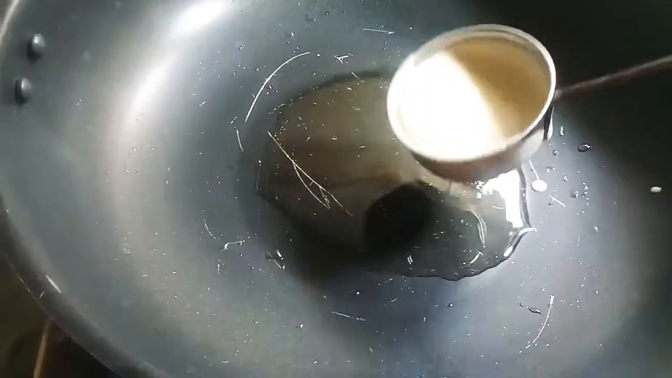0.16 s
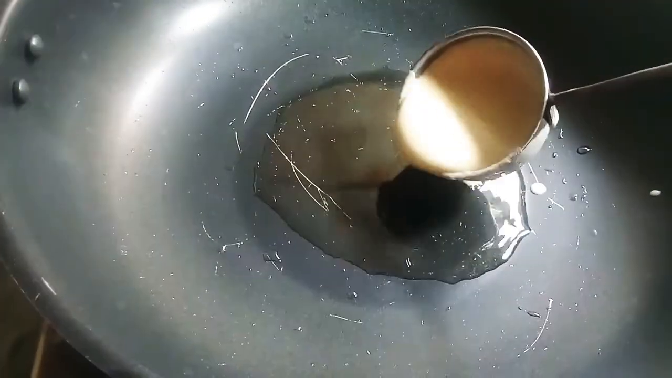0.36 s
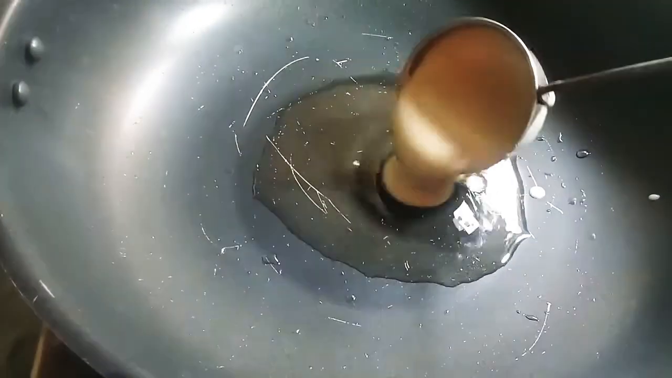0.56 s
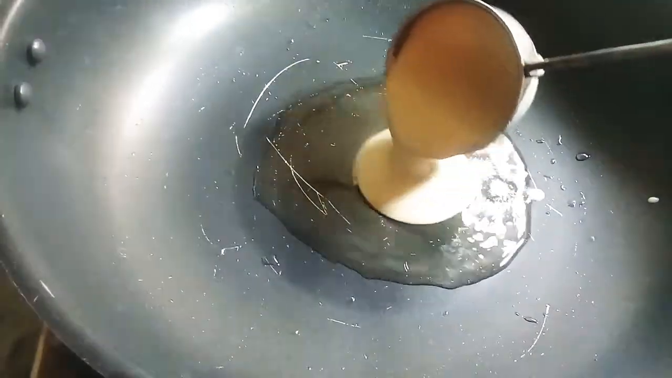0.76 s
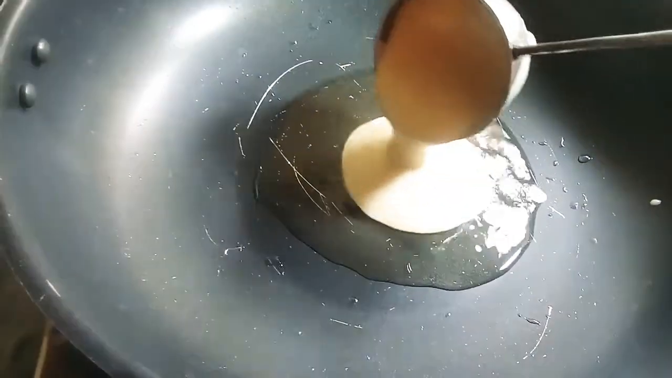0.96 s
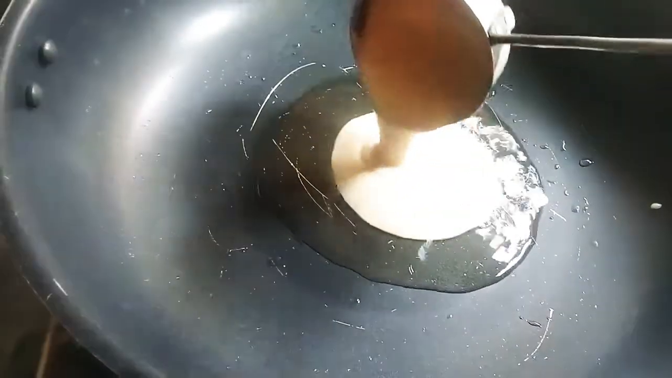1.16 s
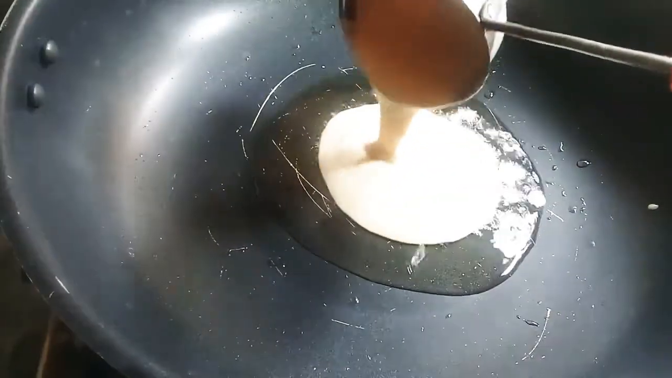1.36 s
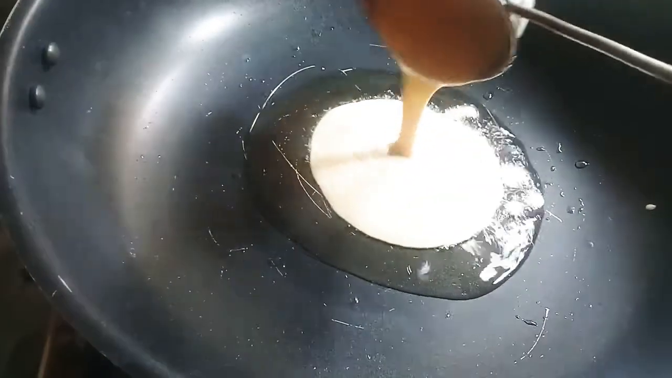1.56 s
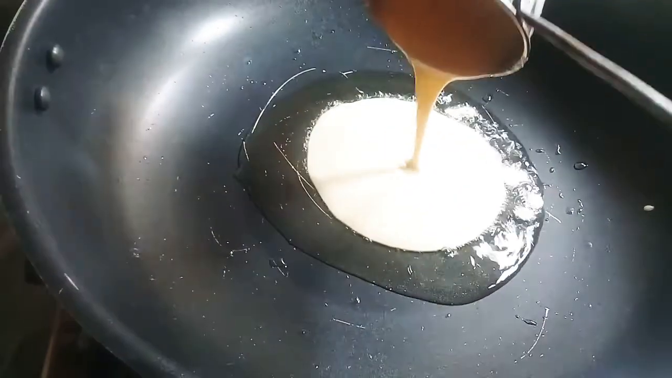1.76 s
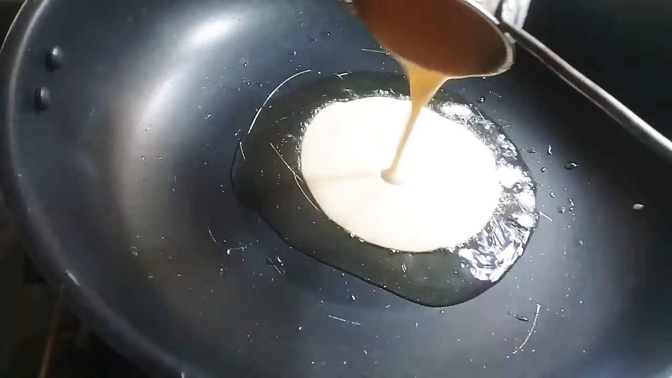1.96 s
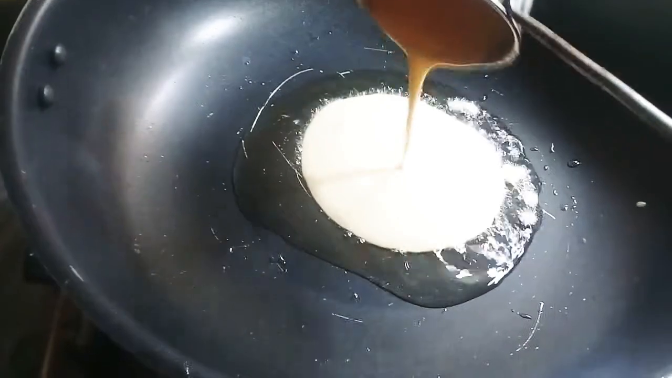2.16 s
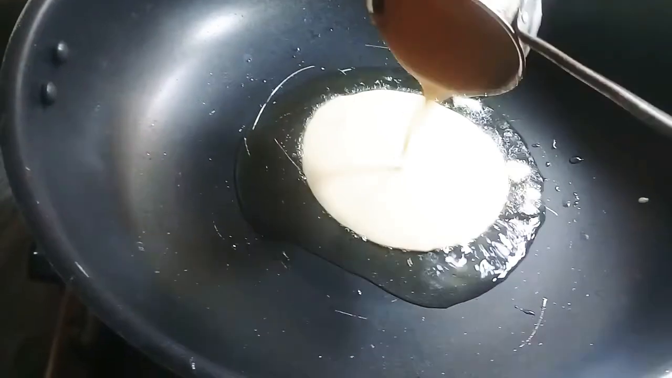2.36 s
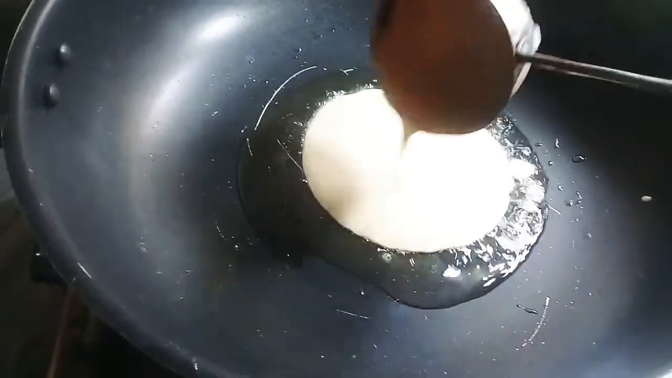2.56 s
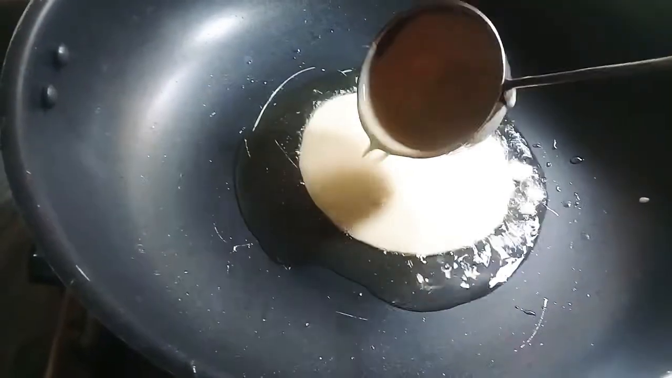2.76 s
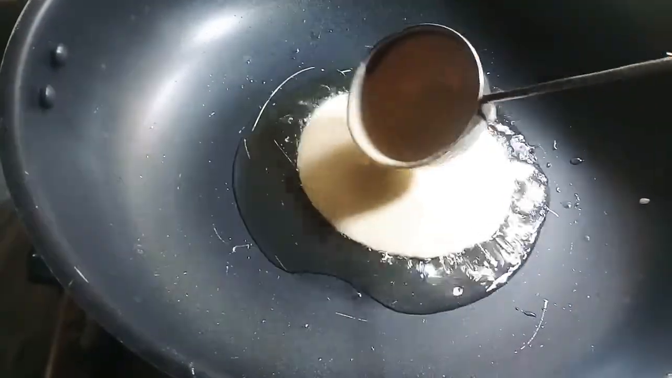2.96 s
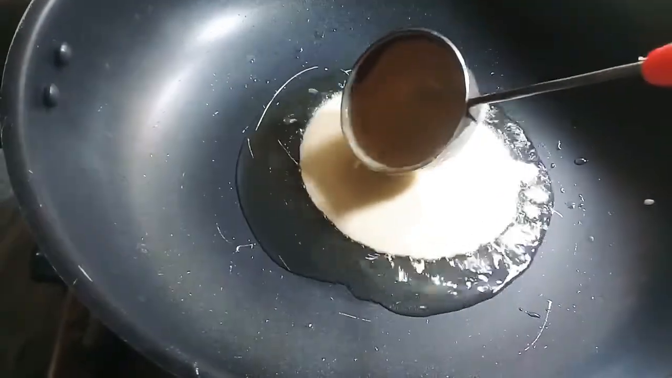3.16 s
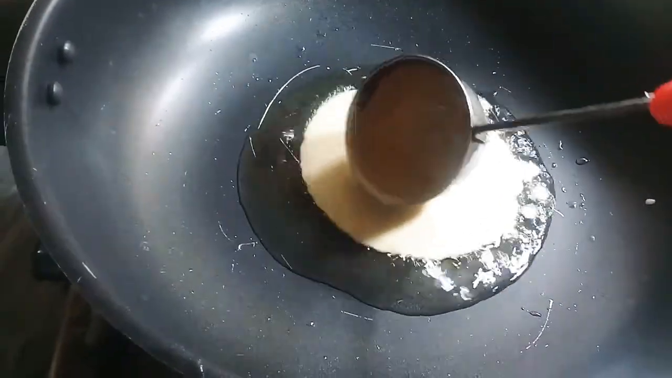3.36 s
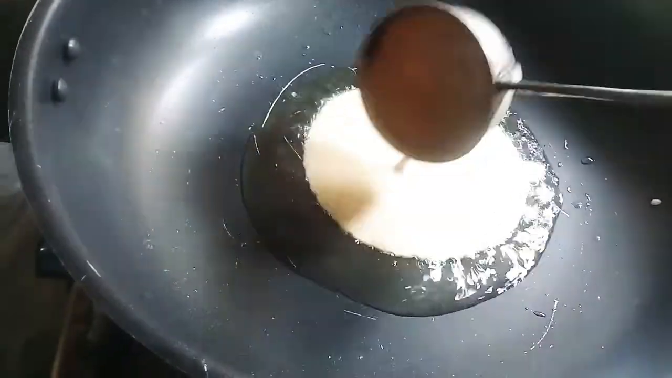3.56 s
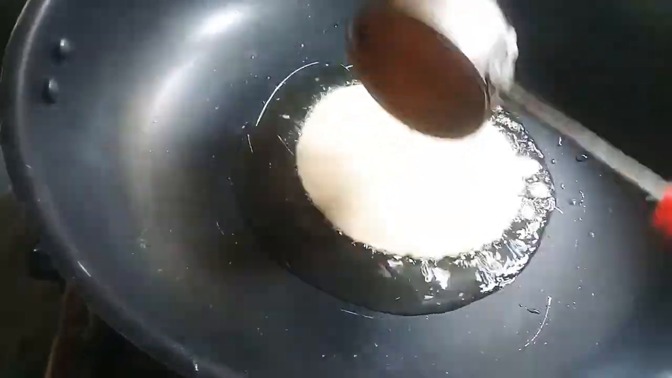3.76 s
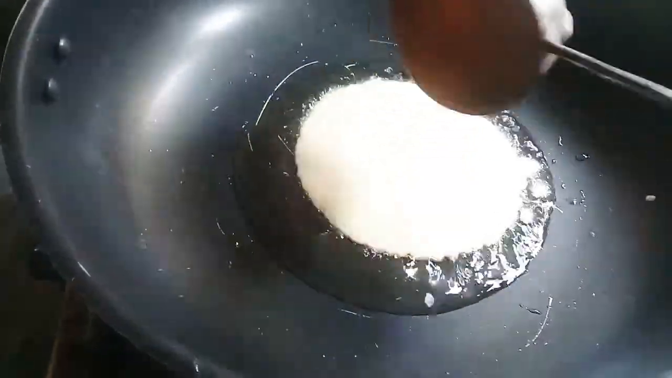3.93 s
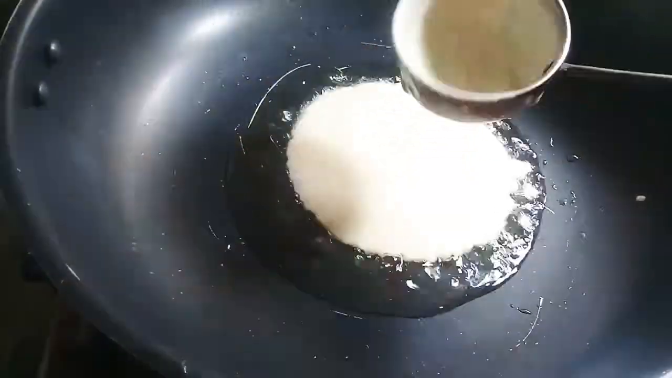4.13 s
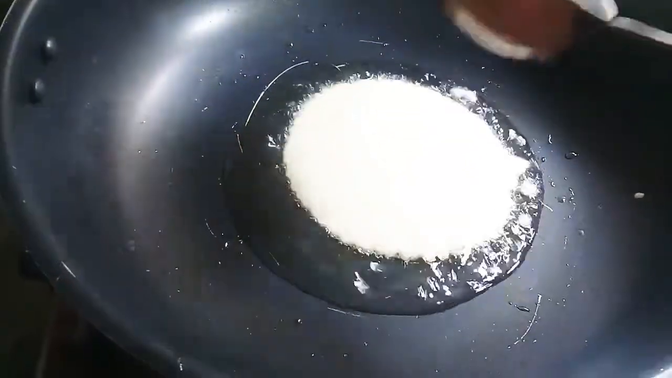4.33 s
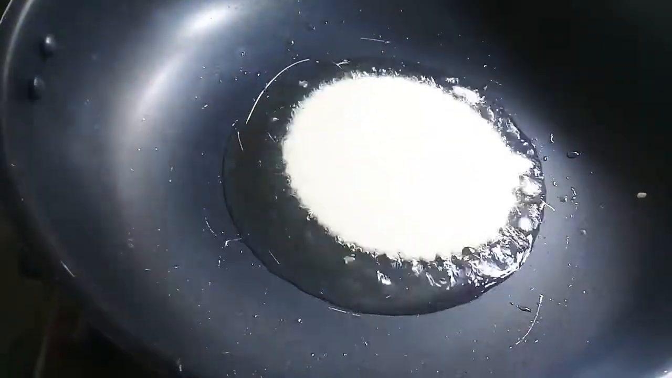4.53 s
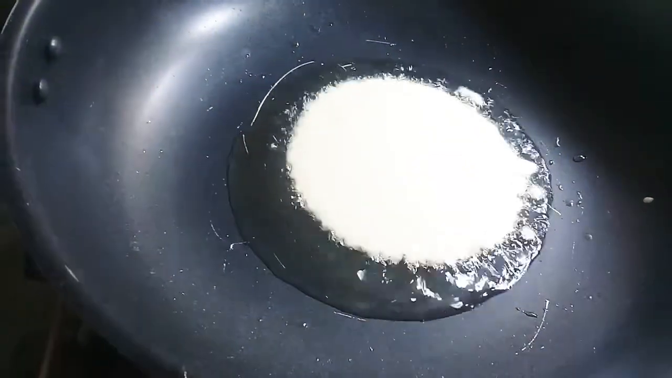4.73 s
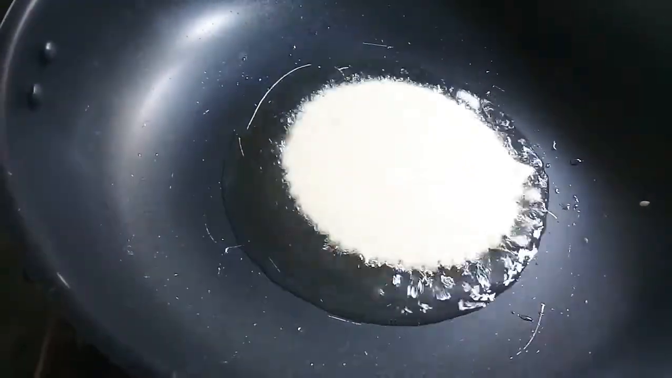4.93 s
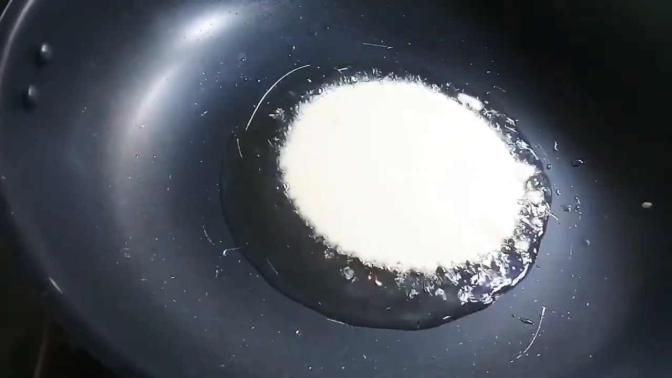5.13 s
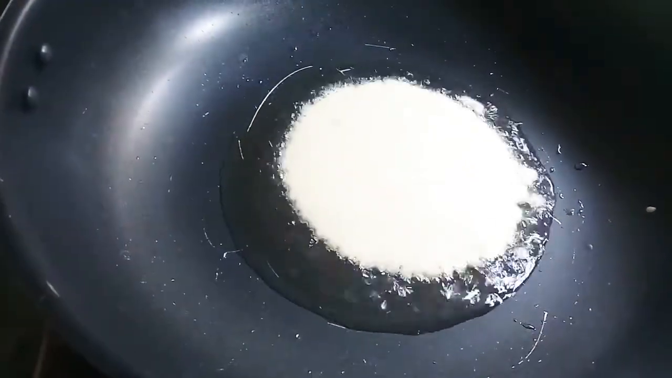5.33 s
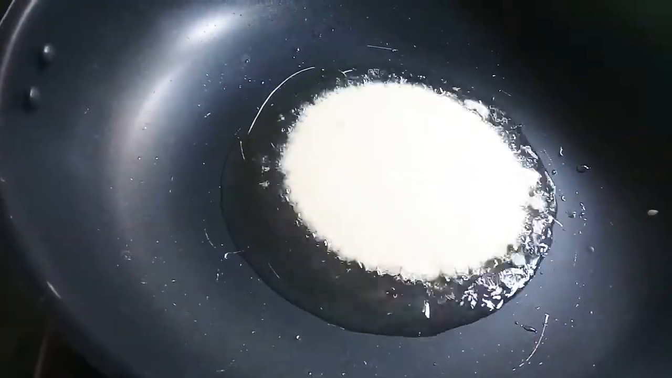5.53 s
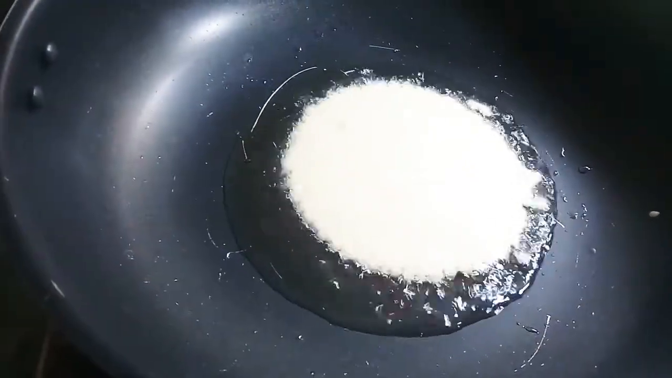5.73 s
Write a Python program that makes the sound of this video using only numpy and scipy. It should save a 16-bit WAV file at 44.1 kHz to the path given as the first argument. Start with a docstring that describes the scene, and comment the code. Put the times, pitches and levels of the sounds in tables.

```python
"""Batter sizzles in hot oil in a wide pan, as its water boils into countless tiny bursting bubbles.
The oil ticks thinly at first, flares up as the batter spreads, then settles with a few spits.
Near the end a steel ladle knocks lightly on a dish and is set down with a bright, ringing clink.
Spits and knocks echo in the small kitchen, and a motor hums behind it all."""
import sys
import numpy as np
from scipy import signal
from scipy.fft import rfft, irfft, next_fast_len
from scipy.io import wavfile
from scipy.ndimage import uniform_filter1d

SR = 44100
rng = np.random.default_rng(int(sys.argv[2]) if len(sys.argv) > 2 else 0)


def master_out(mix):
    """Clip the mix to full scale and print it as 16-bit PCM to the path in sys.argv[1]."""
    frames = np.transpose(np.atleast_2d(mix))
    ceiling = np.clip(frames, -1, 1)
    pcm = np.round(ceiling * 32767).astype(np.int16)
    wavfile.write(sys.argv[1], SR, pcm)


N = 259749
TIME = np.arange(N) / SR


def amp(db):
    """Turns decibels into a gain to multiply by."""
    return 10 ** (np.asarray(db) / 20)


def unit(x):
    """Scales a signal to an average strength (rms) of 1."""
    return x / np.sqrt(np.mean(x ** 2) + 1e-20)


def look_up(points, hz):
    """Reads a table by pitch, sliding smoothly between its rows."""
    pitches, values = np.transpose(points)
    return np.interp(np.log(hz + 1), np.log(pitches + 1), values)


def colour(x, spectrum):
    """Turns each pitch up or down as a table says; the result has strength 1."""
    size = next_fast_len(len(x))
    gain = amp(look_up(spectrum, np.fft.rfftfreq(size, 1 / SR)))
    return unit(irfft(rfft(x, size) * gain, size)[:len(x)])


def band(x, hz, octaves):
    """Keeps only the pitches around hz; the result has strength 1."""
    size = next_fast_len(len(x))
    away = np.log2((np.fft.rfftfreq(size, 1 / SR) + 1) / hz) / octaves
    return unit(irfft(rfft(x, size) * np.exp(-.5 * away ** 2), size)[:len(x)])


def drift(per_s):
    """A random wobble that heads for a new value per_s times a second."""
    knots = rng.standard_normal(4096)
    return unit(np.interp(TIME * per_s, np.arange(len(knots)), knots))


def add(mix, start, sound):
    """Mixes a sound in at a start time in seconds."""
    part = mix[round(start * SR):][:len(sound)]
    part += sound[:len(part)]


def ramp(start, length):
    """A smooth step from 0 to 1."""
    return np.sin(np.pi / 2 * np.clip((TIME - start) / length, 0, 1)) ** 2


def swell(start, rise, hold, release, db):
    """A gain that rises, holds and dies away, with times in seconds."""
    return amp(db) * ramp(start, rise) * (1 - ramp(start + rise + hold, release))


def flare(start, rise, hold, peak_db, settled_db, settle_s):
    """A gain for boiling: it jumps up, holds, and eases as the water in the batter runs out."""
    water_left = np.exp(-np.maximum(TIME - start - rise - hold, 0) / settle_s)
    return ramp(start, rise) * amp(settled_db + (peak_db - settled_db) * water_left)


def bursts(rows, grain):
    """Short rushes of noise; grain makes them sputter. A fade time is the time to fall by 60 dB."""
    t, out = np.arange(SR // 2) / SR, np.zeros(N)
    for start, db, hz, octaves, fade in rows:
        noise, lumps = rng.standard_normal((2, len(t)))
        shape = amp(db - 60 * t / fade) * (1 - np.exp(-(t * hz / 2) ** 2))
        add(out, start, band(noise * np.exp(grain * lumps), hz, octaves) * shape)
    return out


def strike(notes, noise_bands, blows, shimmer):
    """Returns a struck thing's noisy knock and its ring; shimmer makes the high notes flutter."""
    knock = bursts([(start, blow_db + db, hz, octaves, fade)
                    for start, blow_db in blows for db, hz, octaves, fade in noise_bands], grain=0.17)
    hz, db, fade, rise = np.transpose(notes)[:, :, None]
    t, ring = np.arange(SR // 2) / SR, np.zeros(N)
    shape = amp(db - 60 * t / fade) * (1 - np.exp(-(t / rise) ** 2))
    for start, blow_db in blows:
        flutter = unit(uniform_filter1d(rng.standard_normal(shape.shape), 300, axis=1))
        phase = 2 * np.pi * hz * t + shimmer * flutter * hz / hz.max()
        add(ring, start, amp(blow_db) * (shape * np.sin(phase)).sum(0))
    return knock, ring


# The room's hiss and the motor's rumble. Each row: pitch in Hz, relative level in dB.
ROOM_TONE = [(20, -16), (50, -12.5), (70, -6.5), (85, 4.5), (108, -7.5), (135, -7), (165, -16), (200, -10),
             (245, -19.5), (365, -7.5), (480, -20.5), (680, -27), (1600, -53), (15000, -29.5)]
# The motor's notes. Each row: pitch in Hz, level in dB.
MOTOR_NOTES = [(101, -58.5), (81.4, -68)]


def motor():
    """A motor hums, wavering a little, over the steady noise of the room."""
    rumble = amp(-57.5) * colour(rng.standard_normal(N), ROOM_TONE)
    hum = sum(amp(db + 2.0 * drift(7.0)) * unit(np.sin(2 * np.pi * hz * TIME + 0.26 * drift(3.0)))
              for hz, db in MOTOR_NOTES)
    return rumble + hum


def drone(hz=129):
    """A low note swells once, with a breathy band a fifth above it."""
    note = unit(np.sin(2 * np.pi * hz * TIME + 0.28 * drift(11.8)))
    breath = amp(-8.5) * band(rng.standard_normal(N), hz * 3 / 2, octaves=0.3)
    return (note + breath) * swell(start=2.03, rise=0.22, hold=0.14, release=0.17, db=-52.5)


# How long the kitchen echoes. Each row: pitch in Hz, fade time in seconds.
ECHO_FADES = [(200, 0.62), (2000, 0.62), (6000, 0.8), (15000, 0.33)]


def kitchen_echo(x):
    """The room smears a sound into a soft tail whose highest treble dies first."""
    hz, t, noise = signal.stft(rng.standard_normal(SR // 2), SR, nperseg=256)
    fading = noise * amp(-60 * t / look_up(ECHO_FADES, hz)[:, None]) * (t > .008)
    tail = signal.istft(fading, SR, nperseg=256)[1]
    return signal.oaconvolve(x, tail / np.linalg.norm(tail))[:N]


# The notes that ladle and dish ring with.
# Each row: pitch in Hz, relative level in dB, fade time in seconds, rise time in seconds.
LADLE_NOTES = [(1513, -19, .25, .001), (2175, -26, .9, .002), (2773, -2.5, .38, .002),
               (2844, -6.5, .5, .002), (3080, -23, .2, .002), (4636, -6.5, .47, .001),
               (4654, -16, .6, .002), (4730, -13, .12, .001), (5548, -13, .55, .006), (5700, -18, .2, .001),
               (6305, -2, .29, .045), (6632, -17, .35, .004), (7165, -26, .45, .02), (7900, -27, .2, .002),
               (8742, -26, .3, .005), (9130, -29, .3, .005), (9862, -13, .22, .003),
               (10396, -11, .22, .015), (10578, -14, .2, .015), (10658, -14, .2, .015),
               (10790, -20, .18, .004), (11190, -19, .18, .004), (11940, -21, .2, .004),
               (12420, -25, .3, .004), (12940, -12, .2, .001), (13343, -10, .17, .02),
               (13625, -16, .19, .006), (14265, -18, .19, .008), (14414, -15, .22, .006),
               (14770, -20, .2, .002)]
DISH_NOTES = [(790, -17, .15, .001), (1560, -10, .07, .001), (1850, -8, .06, .001), (3074, 1, .11, .012),
              (3930, -13, .1, .001), (4810, -9, .16, .002), (4910, -4, .08, .001)]
# The noisy part of each one's knock.
# Each row: relative level in dB, pitch in Hz, width in octaves, fade time in seconds.
LADLE_CLASH = [(-25, 410, 0.59, 0.82), (7, 1620, 0.2, 0.017), (-4, 1800, 1.17, 0.22),
               (-5, 8500, 2.7, 0.017), (-10, 10450, 0.072, 0.37), (-7, 13600, 0.11, 0.29)]
DISH_CLASH = [(-5, 1300, 0.78, 0.23), (-15.5, 10000, .25, 0.14)]
# When each one is struck. Each row: start in seconds, relative level in dB.
LADLE_BLOWS = [(5.509, -12.5)]
DISH_BLOWS = [(5.407, -26), (5.479, -44)]
# The ladle coming to rest.
# Each row: start in seconds, relative level in dB, pitch in Hz, width in octaves, fade time in seconds.
RATTLES = [(5.665, -35, 1070, 0.39, 0.52), (5.713, -28, 3020, 0.27, 0.065), (5.79, -34.5, 280, 0.51, 0.23)]


def ladle():
    """The ladle touches the dish, clinks, then rattles and thuds to rest; returns knocks and ringing."""
    dish_knock, dish_ring = strike(DISH_NOTES, DISH_CLASH, DISH_BLOWS, shimmer=0.55)
    ladle_knock, ladle_ring = strike(LADLE_NOTES, LADLE_CLASH, LADLE_BLOWS, shimmer=0.82)
    knocks = dish_knock + ladle_knock + bursts(RATTLES, grain=0.17)
    return amp(-7.5) * knocks, dish_ring + ladle_ring


# The batter landing.
# Each row: start in seconds, relative level in dB, pitch in Hz, width in octaves, fade time in seconds.
PLOPS = [(0.556, -37.5, 260, 0.64, 0.18)]


def batter_plop():
    """The batter drops into the oil with a low, soft plop."""
    return amp(-7.5) * bursts(PLOPS, grain=0.17)


# The oil's main spits.
# Each row: start in seconds, relative level in dB, pitch in Hz, width in octaves, fade time in seconds.
SPITS = [(0.049, -45, 7000, 1, .08), (0.238, -43.5, 12200, 0.32, 0.16), (0.473, -35, 2770, 0.25, 0.071),
         (0.518, -30.5, 2900, 0.26, 0.075), (0.557, -23.5, 2840, 0.12, 0.038),
         (0.575, -33, 13500, 0.33, 0.0077), (1.578, -28.5, 7800, 0.1, .04), (1.751, -24, 4900, 0.16, 0.039),
         (2.975, -33, 10200, .1, 0.029), (3.088, -30.5, 3530, 0.87, 0.061),
         (3.415, -26.5, 4020, 0.16, 0.053), (3.428, -25.5, 3320, 0.44, 0.083),
         (3.498, -25, 4000, 0.45, 0.054), (3.503, -23, 3630, 0.27, 0.067), (3.802, -32.5, 5900, 0.4, 0.12),
         (4.569, -23, 5500, 0.81, 0.0054)]


def oil_spits(faint_count=12, faint_from_s=2.2, low_hz=4400, high_hz=12100):
    """The oil spits sharply; faint spits join by chance once the batter's edge starts to set."""
    faint = []
    for when, weakness, height in rng.random((faint_count, 3)):
        start = faint_from_s + when * (N / SR - faint_from_s)
        hz = low_hz * (high_hz / low_hz) ** height
        faint.append((start, -35.5 - 8 * weakness, hz, 0.23, 0.044))
    return amp(-8) * bursts(SPITS + faint, grain=0.56)


def oil_ticks(vigour, per_s=110):
    """Single drops of oil snap dryly, louder when the frying is stronger."""
    snaps = (rng.random(N) < per_s / SR) * rng.standard_normal(N)
    return amp(-35.5) * band(snaps, hz=6500, octaves=2.5) * vigour ** .5


# When each part of the frying flares up, in seconds; the finest bubbles answer the batter first.
FIZZ_S, CRACKLE_S, SIMMER_S, HOLLOW_S = 0.608, 0.63, 0.665, 0.75


def pan_hollow(hz=401):
    """The pour stirs the pan's hollow note and gulps once at the same pitch."""
    gain = flare(HOLLOW_S, rise=0.07, hold=0.3, peak_db=-52, settled_db=-70, settle_s=0.8)
    hollow = band(rng.standard_normal(N), hz, octaves=0.064) * gain
    gulp = swell(start=0.838, rise=0.025, hold=0.008, release=0.025, db=-42)
    return hollow + gulp * unit(np.sin(2 * np.pi * hz * TIME))


# The ringing spot under the ladle. Each row: pitch in Hz, width in octaves, relative level in dB.
SPOT_BANDS = [(2734, 0.012, -1.5), (2900, 0.0087, 2), (3460, 0.036, 3), (3700, 0.0089, 0), (4133, 0.011, 8),
              (4400, .02, -20), (4920, .02, 2)]


def pour_spot():
    """The oil right under the ladle spatters and rings, for the first drip and then for the pour."""
    drops = rng.standard_normal(N) * amp(2.1 * drift(150))
    ringing = unit(sum(amp(db) * band(drops, hz, octaves) for hz, octaves, db in SPOT_BANDS))
    drip = swell(start=0.2, rise=0.2, hold=0.45, release=0.14, db=-48.5)
    pour = flare(FIZZ_S, rise=0.16, hold=0.4, peak_db=-48, settled_db=-80, settle_s=0.5)
    return ringing * (drip + pour)


# Small flurries in the oil, before and after the pour.
# Each row: start in seconds, crackle level in dB, fizz level in dB, fade time in seconds.
FLURRIES = [(0.0, -54.5, -66, 1.8), (0.232, -66, -58, 1.4), (0.312, -50, -60.5, 1.8), (0.45, -53, -72, 6.0),
            (3.86, -48, -68, 4.4)]


def boiling(waver_db=0.58, wavers_per_s=7):
    """Gains for crackle, fizz and simmer: bare hot oil, the pour and the flurries add their power."""
    pour = (flare(CRACKLE_S, rise=0.1261, hold=0.44, peak_db=-36.5, settled_db=-52, settle_s=1.82),
            flare(FIZZ_S, rise=0.02, hold=0.64, peak_db=-48.5, settled_db=-59, settle_s=3.5),
            flare(SIMMER_S, rise=0.23, hold=0.35, peak_db=-46, settled_db=-66, settle_s=3.9))
    bare_oil_db = (-65, -72, -76.5)
    crackle, fizz, simmer = [amp(db) ** 2 + gain ** 2 for db, gain in zip(bare_oil_db, pour)]
    for start, crackle_db, fizz_db, fade in FLURRIES:
        shape = ramp(start, 0.018) * amp(-60 * np.maximum(TIME - start, 0) / fade)
        crackle += (amp(crackle_db) * shape) ** 2
        fizz += (amp(fizz_db) * shape) ** 2
    return [np.sqrt(power) * amp(waver_db * drift(wavers_per_s)) for power in (crackle, fizz, simmer)]


def pops(vigour, low_hz, high_hz, per_s, spread_db, cycles, clump_db, sizes=14):
    """Bubbles of many sizes burst in clumps, thicker as the frying grows; each is a tiny dying snap."""
    t, out = np.arange(256) / SR, np.zeros(N)
    crowding = unit(vigour)
    for hz in np.geomspace(low_hz, high_hz, sizes):
        bursting = rng.random(N) < crowding * per_s / sizes / SR
        size_db = spread_db * np.minimum(rng.exponential(1, N), 4)
        kicks = bursting * amp(size_db) * rng.choice([-1, 1], N)
        pop = np.sin(2 * np.pi * hz * t) * np.exp(-t * hz / cycles)
        out += np.convolve(kicks, unit(pop) * np.sqrt(hz))[:N]
    return unit(out * amp(clump_db * drift(45)) / np.sqrt(crowding))


def fry(single_pops, spectrum, hiss_db, echo_db, echo_s):
    """Pops ride on the hiss of countless smaller ones, and the steel wall throws them faintly back."""
    direct = colour(single_pops + amp(hiss_db) * rng.standard_normal(N), spectrum)
    t = np.arange(1024) / SR
    wall = rng.standard_normal(len(t)) * np.exp(-t / echo_s) * (t > .0005)
    return unit(direct + amp(echo_db) * unit(signal.oaconvolve(direct, wall)[:N]))


# The bottom edge of the crackle. Each row: time in seconds, lowest pitch in Hz.
LOWEST_PITCH = [(0.25, 2150), (0.34, 3300), (0.48, 1830), (0.65, 1900), (0.76, 1400)]


def bubble_growth(crackle):
    """Cuts away the crackle below a moving pitch, which sinks as the bubbles grow."""
    hz, t, slices = signal.stft(crackle, SR, nperseg=512)
    ratio = (hz[:, None] + 1) / np.interp(t, *np.transpose(LOWEST_PITCH))
    return signal.istft(slices / np.sqrt(1 + ratio ** -18), SR, nperseg=512)[1][:N]


# The pitches the pan rings at. Each row: pitch in Hz, width in octaves, boost in dB.
PAN_NOTES = [(730, 0.025, 0.5), (1076, 0.051, 4), (1285, 0.015, 5), (1653, 0.023, 3.5), (2167, 0.0045, 8),
             (2373, 0.013, 6.5), (3000, 0.023, 0.5), (3480, .03, 0.5), (4250, 0.016, 2), (5570, 0.018, 1),
             (5930, 0.0059, 5)]


def pan_body(x):
    """The pan rings along with the bubbles and makes its own pitches louder."""
    hz = np.fft.rfftfreq(N, 1 / SR) + 1
    lift_db = sum(db * np.exp(-.5 * (np.log2(hz / note) / octaves) ** 2)
                  for note, octaves, db in PAN_NOTES)
    return irfft(rfft(x) * amp(lift_db), N)


# The tone of middle-sized, fine and large bubbles. Each row: pitch in Hz, relative level in dB.
CRACKLE_TONE = [(1300, -62), (1850, -6), (2300, -6.5), (3000, -1), (3800, -2), (4400, -2.5), (5500, -4.5),
                (6300, -9.5), (7500, -23), (11000, -37)]
FIZZ_TONE = [(3500, -15), (6500, 0.5), (8500, -2), (11000, -1), (13000, -3), (15000, -7.5), (16000, -11)]
SIMMER_TONE = [(150, -21), (300, -6.5), (480, -6.5), (620, -12), (760, -1.5), (900, -2.5), (1130, -1),
               (1400, -3), (1650, 0.5), (2200, -3.5), (2900, 2), (4500, -15)]


def sizzle(crackle_gain, fizz_gain, simmer_gain):
    """Water boils out of the batter: middle-sized bubbles crackle, fine ones fizz, large ones simmer."""
    middle = pops(crackle_gain, 1900, 7800, per_s=9000, spread_db=1.0, cycles=0.4, clump_db=0.98)
    fine = pops(crackle_gain, 5700, 17600, per_s=9000, spread_db=2.5, cycles=0.49, clump_db=2.2)
    large = pops(crackle_gain, 364, 2680, per_s=6000, spread_db=1.5, cycles=0.64, clump_db=1.0)
    crackle = fry(middle, CRACKLE_TONE, hiss_db=-0.87, echo_db=-8, echo_s=0.012)
    crackle = bubble_growth(crackle) * crackle_gain
    fizz = fry(fine, FIZZ_TONE, hiss_db=-0.45, echo_db=-11, echo_s=0.008) * fizz_gain
    simmer = fry(large, SIMMER_TONE, hiss_db=1, echo_db=-12, echo_s=0.054) * simmer_gain
    return pan_body(amp(-0.49) * crackle + amp(0.88) * fizz + amp(1.18) * simmer)


def scene():
    """The pan close by and the ladle a little farther off, the same in both channels."""
    crackle_gain, fizz_gain, simmer_gain = boiling()
    frying = sizzle(crackle_gain, fizz_gain, simmer_gain)
    frying += pour_spot() + pan_hollow() + oil_ticks(fizz_gain)
    spits = oil_spits()
    plop = batter_plop()
    knocks, ringing = ladle()
    echo = kitchen_echo(amp(-8) * spits + amp(-7) * (plop + knocks) + amp(-14) * ringing)
    mix = frying + spits + plop + knocks + ringing + echo + motor() + drone()
    return np.array([mix, mix])


def record(dry):
    """Steeply cuts off the very highest treble."""
    cutoff_hz = 15850
    low_pass = signal.firwin(511, cutoff_hz, window=("kaiser", 9), fs=SR)
    return signal.oaconvolve(dry, low_pass[None], "same")


dry = scene()
out = record(dry)
master_out(out)
```